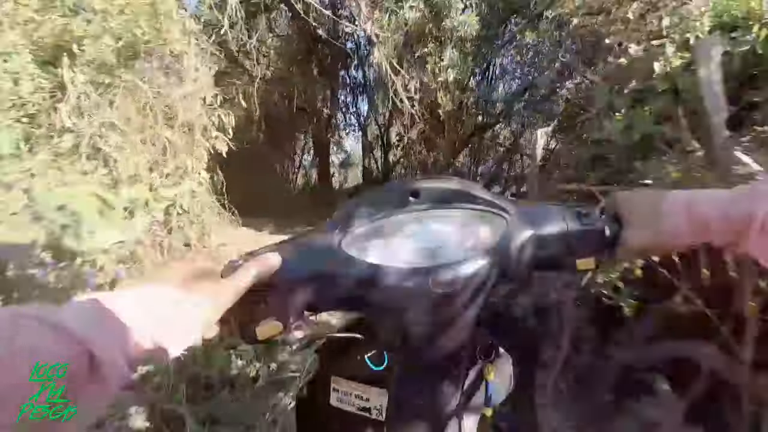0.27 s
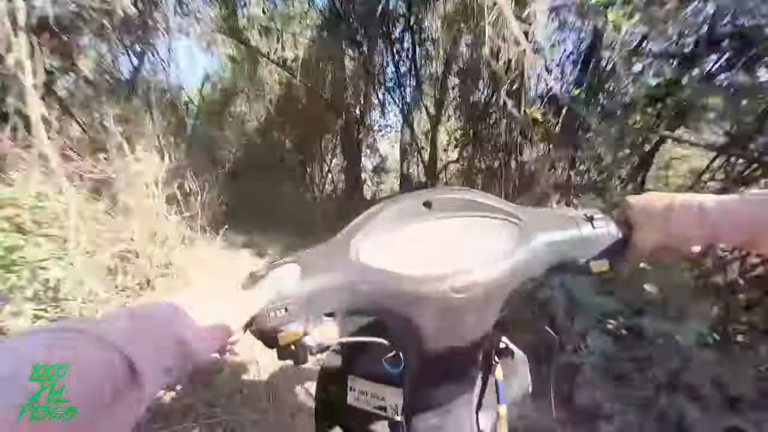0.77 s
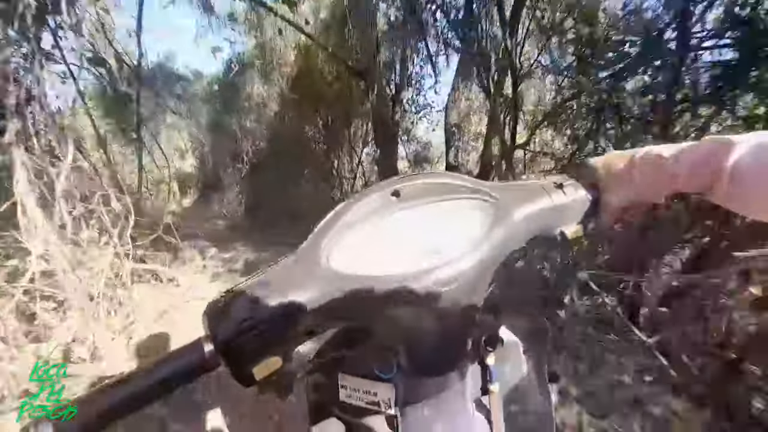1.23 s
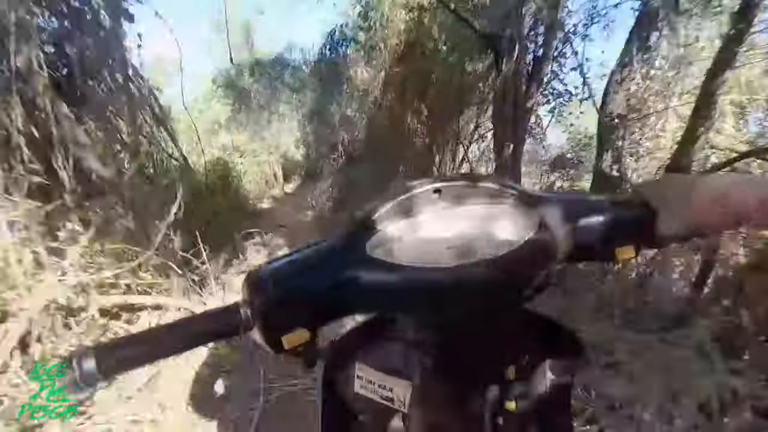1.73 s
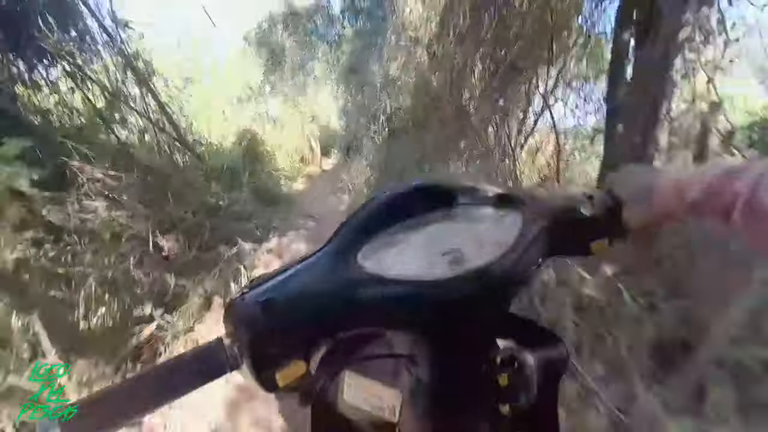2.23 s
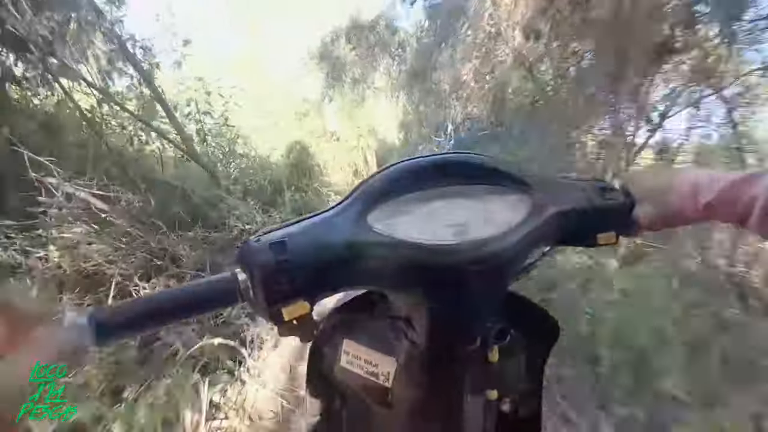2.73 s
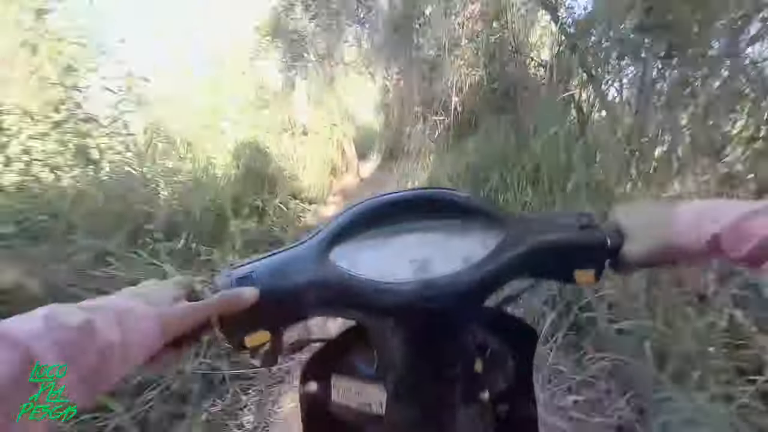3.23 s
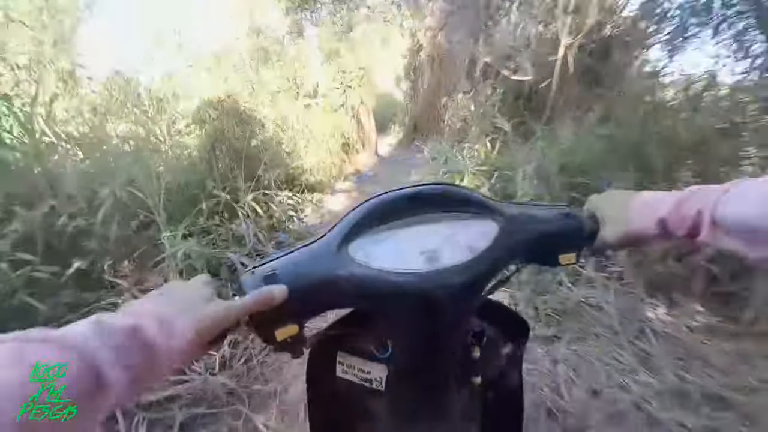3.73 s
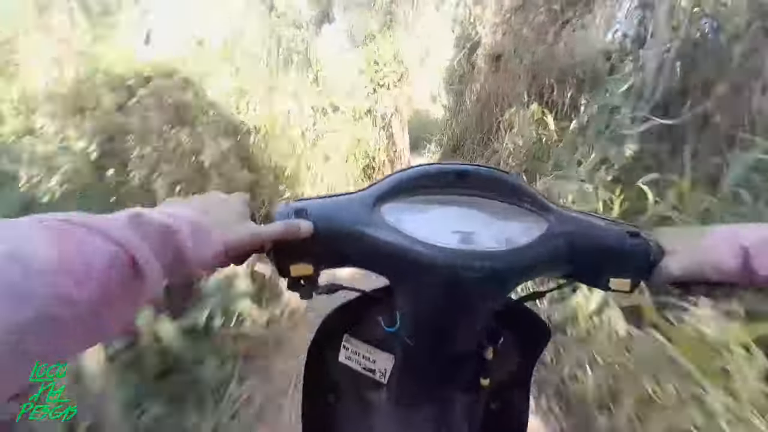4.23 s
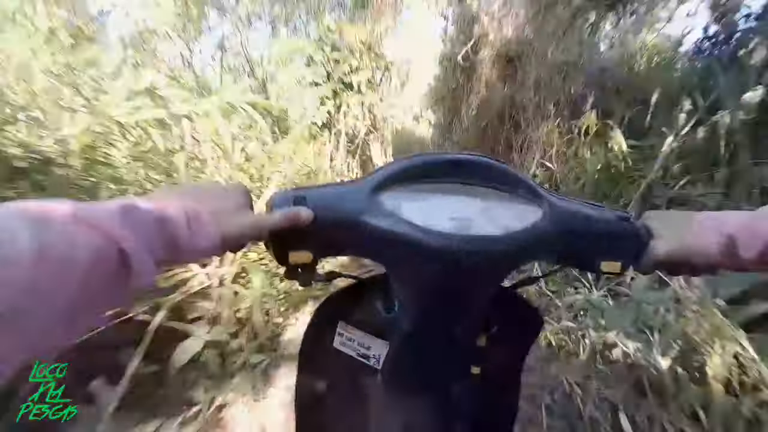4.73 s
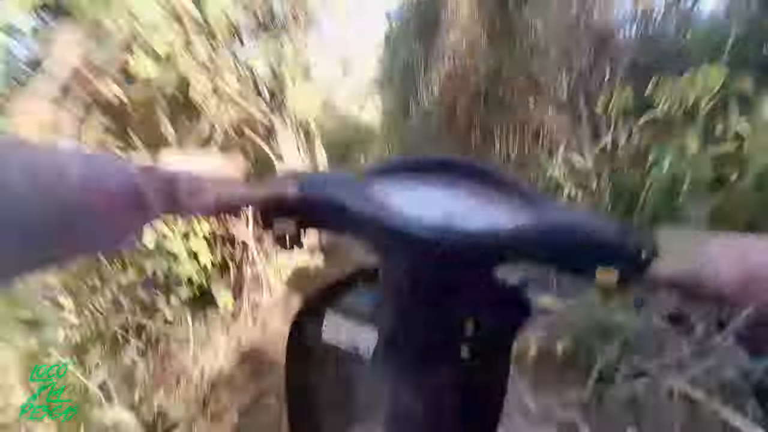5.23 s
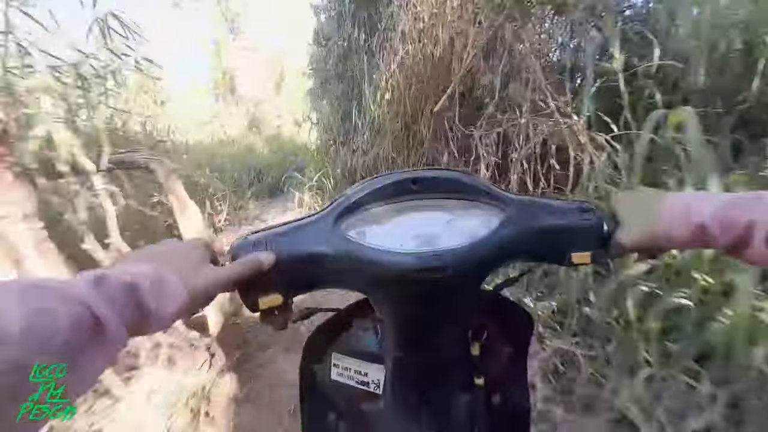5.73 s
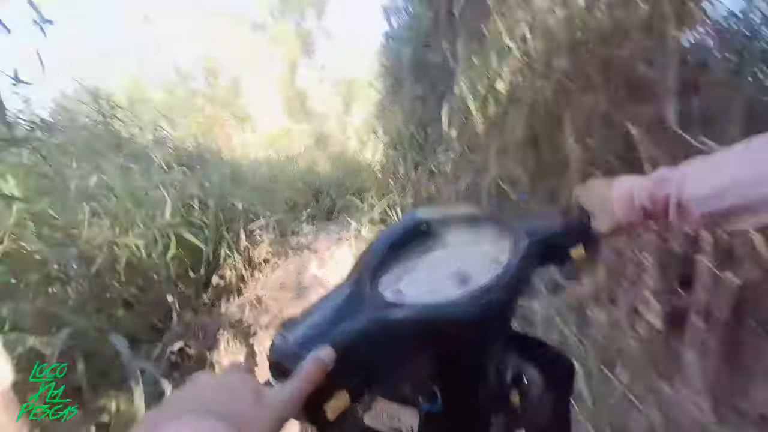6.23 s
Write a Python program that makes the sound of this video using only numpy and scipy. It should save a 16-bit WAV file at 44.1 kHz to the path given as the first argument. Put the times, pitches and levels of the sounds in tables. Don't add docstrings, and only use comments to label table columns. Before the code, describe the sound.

A low, soft putt-putt from a little scooter engine runs throughout, stumbling early, revving up before three seconds, sagging around five and rising again. Over it come a rumbling dirt surface, swishing dry undergrowth, hollow bodywork knocks, cracking twigs, ticking grit and slight key jingles. Outdoors, very close microphones on the rider or vehicle; the left channel is crisp with chopped engine thumps, the right muffled and bassy.

```python
import sys
import numpy as np
from scipy import signal
from scipy.io import wavfile

SR = 44100
rng = np.random.default_rng(int(sys.argv[2]) if len(sys.argv) > 2 else 0)


def inscribe(sig):
    pcm = np.round(np.clip(np.atleast_2d(sig).T, -1, 1) * 32767)
    wavfile.write(sys.argv[1], SR, pcm.astype(np.int16))


def gain_from_db(level_db):
    decades = np.asarray(level_db, float) / 20
    return 10 ** decades


N = 286209


def rms_one(x):
    return x / np.sqrt(np.mean(x ** 2) + 1e-20)


def at_hz(points, hz):
    point_hz, value = np.array(points).T[:2]
    return np.interp(np.log(hz), np.log(point_hz), value)


def in_time(rows):
    return np.interp(np.arange(N) / SR, *np.transpose(rows))


def drift(rate):
    r = np.exp(-80 * np.pi * rate / SR)
    noise = rng.standard_normal(N // 40 + 2002)
    slow = signal.lfilter([1], [1, -2 * r, r * r], noise)[2000:]
    return np.interp(np.arange(N) / 40, np.arange(len(slow)), rms_one(slow))


def passed(x, order, hz, kind):
    return signal.sosfilt(signal.butter(order, hz, kind, fs=SR, output="sos"), x)


def ring(clicks, hz, t60):
    r = gain_from_db(-60 / (t60 * SR))
    w = 2 * np.pi * hz / SR
    return signal.lfilter([0, np.sin(w)], [1, -2 * r * np.cos(w), r * r], clicks + 1e-18)


def resonate(x, hz, width_hz):
    r = np.exp(-np.pi * width_hz / SR)
    w = 2 * np.pi * hz / SR
    return signal.lfilter([(1 - r * r) / 2, 0, (r * r - 1) / 2], [1, -2 * r * np.cos(w), r * r], x)


def clicks_at(seconds, sizes):
    train = np.zeros(N)
    train[np.clip(np.round(seconds * SR).astype(int), 0, N - 1)] = sizes
    return train


def two_ports(source, open_port, covered_port, low_hz, top_hz, patchy_db):
    # pitch in Hz, likeness from 0 to 1.
    likeness = [(60, .7), (160, .75), (300, .7), (500, .55), (800, .35), (1400, .15), (15000, .05)]
    edges = low_hz * 2 ** np.arange(0, np.log2(top_hz / low_hz), 1 / 3)
    out = 0
    for k, (low, high) in enumerate(zip(edges, edges[1:])):
        a, b = passed(source[k % 2], 2, [low, high], "band")
        hz = np.sqrt(low * high)
        alike = np.clip(at_hz(likeness, hz), 0, 1)
        port_db = np.array([[at_hz(open_port, hz)], [at_hz(covered_port, hz)]])
        gains = gain_from_db(port_db + patchy_db * drift(23))
        out = out + gains * np.array([a, alike * a + np.sqrt(1 - alike ** 2) * b])
    return out / np.std(out[0])


def firings():
    # time in seconds, firings per second.
    speed = [(0.15, 19.065), (0.42, 15.917), (1.48, 16.018), (1.67, 14.188), (2.08, 14.169), (2.36, 18.806),
             (2.7, 20.536), (2.86, 20.932), (3.27, 19.705), (3.41, 17.228), (3.72, 18.3), (4.17, 18.355),
             (4.5, 16.405), (5.23, 14.38), (5.89, 15.741), (5.95, 16.96), (6.22, 17.998), (6.49, 21.663)]
    # time in seconds, firing strength in dB.
    throttle = [(.16, -2.5), (.5, -7.5), (.8, -5), (1.1, -5.5), (1.35, -2.5), (1.9, -1.5), (2.0, 3),
                (2.4, 1.5), (2.95, 1.5), (3.25, -3), (3.9, -1), (4.25, -3.5), (4.45, -2), (4.8, -2.5),
                (5.0, -1.5), (5.75, -.5), (5.9, 1.5), (6.45, 2)]
    # time in seconds, strength in dB, depth in dB, bark in dB.
    odd_firings = [(.0066, -2, -19, -32), (0.037, -4, -9, -5), (0.0707, -0.5, 7, -4),
                   (0.131, -10, -15, -10), (0.269, -4, 7, -5), (0.3316, -5, 2, 2.5), (0.3906, -15, -1, 6.5),
                   (0.5116, -6.5, 1, 2), (0.5764, -13.5, -4, 2), (0.6539, -16, -11, -15), (0.7, -13, 7, 2),
                   (.7690, -9, 7, 5.5), (0.895, -8, -5, 4.5), (0.953, -2, 5, -12), (1.3281, -4, 6, 4.5),
                   (1.455, -2.5, 3, 1.5), (1.5139, -2, 3, 2.5), (1.586, -14.5, -3, 0),
                   (1.721, -16.5, -6, 9), (1.8647, 0, -7, -0.5), (1.93, -1.5, 1, -3), (3.2661, -3, 1, -9),
                   (3.316, -13.5, -4, 6), (3.373, -6.5, 4, 4.5), (5.2042, -11, -4, 1.5),
                   (5.345, 0.5, -12, -8), (5.67, 0, 2.5, 1), (5.9903, 2.5, -2, 1), (6.0406, 1.5, -1, 0.5),
                   (6.327, 3, -7, 1.5)]
    first_turn = .098
    takes_place_s = .025
    turns = np.cumsum(in_time(speed)) / SR - first_turn
    seconds = np.interp(np.arange(int(turns[-1]) + 1), turns, np.arange(N) / SR)
    chance = rng.standard_normal((3, len(seconds)))
    strength_db = np.interp(seconds, *np.transpose(throttle)) + .5 * chance[0]
    above_idle = np.interp(seconds, *np.transpose(speed)) - 15.4
    depth_db = 2.5 - 1.47 * above_idle + .7 * chance[1]
    bark_db = 1 - .2 * strength_db + .5 * chance[2]
    odd = np.transpose(odd_firings)
    regular = np.abs(seconds[:, None] - odd[0]).min(axis=1) > takes_place_s
    even = np.array([seconds, strength_db, depth_db, bark_db])
    return np.hstack([even[:, regular], odd])


def exhaust(fired):
    # pitch in Hz, ring time t60 in seconds,
    # right level in dB, left level in dB, sign, part (0 body, 1 depth, 2 bark).
    silencer = [
        (121.8, .122, -.8, -13, -1, 0),
        (238, .18, -10.5, -14, -1, 2),
        (215, .045, 1.5, -6.5, 1, 2),
        (85.5, .1, -11.8, -25, 1, 1),
    ]
    seconds, strength_db, depth_db, bark_db = fired
    misfire_db, afterburn_db, afterburn_s = -10, 9, .07
    puff = signal.windows.hann(round(.006 * SR))
    puff /= puff.sum()
    scatter_db = .7 * rng.standard_normal((len(seconds), len(silencer), 2))
    parts_db = [0 * depth_db, np.clip(depth_db, -15, 7), bark_db]
    gas = gain_from_db(-63 + 2.5 * drift(6)) * rng.standard_normal(N)
    unburnt = clicks_at(seconds - afterburn_s / 4, strength_db < misfire_db)
    swell = signal.fftconvolve(unburnt, signal.windows.hann(round(afterburn_s * SR)))[:N]
    gas = gas * gain_from_db(afterburn_db * swell)
    out = np.zeros((2, N))
    for k, (hz, t60, right_db, left_db, sign, part) in enumerate(silencer):
        for side, level_db in enumerate((left_db, right_db)):
            blow_db = strength_db + parts_db[round(part)] + scatter_db[:, k, side]
            blows = clicks_at(seconds - .0089, gain_from_db(blow_db)) + gas
            out[side] += sign * gain_from_db(level_db) * ring(np.convolve(blows, puff)[:N], hz, t60)
    return out


def open_port_duck(fired):
    # from seconds, to seconds, share from 0 to 1.
    spared = [(0, .2, .7), (.2, .25, .3), (.25, .47, .55), (.75, .8, .35), (.8, 1.17, 1),
              (1.3, 1.35, .4), (1.49, 1.54, .4), (1.62, 1.68, .85), (1.76, 1.82, .6), (1.9, 1.96, .55),
              (1.97, 2.34, 1), (2.45, 2.5, .3), (2.5, 2.6, .8), (2.89, 2.94, .55), (2.99, 3.04, .5),
              (3.09, 3.14, .55), (3.14, 3.29, .9), (3.52, 3.57, .5), (3.63, 3.68, .45),
              (3.79, 3.84, .45), (3.96, 4.06, .65), (4.29, 4.34, .4), (4.4, 4.45, .4), (4.46, 4.51, .7),
              (4.52, 4.7, 1), (4.84, 4.89, .5), (4.97, 5.02, .5), (5.25, 5.36, .8), (5.52, 5.57, .4),
              (5.58, 5.63, .85), (5.84, 5.89, .45), (5.9, 5.95, .75), (6.25, 6.3, .4), (6.3, 6.35, .6),
              (6.4, 6.45, .4)]
    # seconds from the firing, share of the cut.
    duck_shape = [(-.011, 0), (-.006, .75), (-.003, 1), (.002, .95), (.006, .5), (.009, .3), (.013, 0)]
    seconds = fired[0]
    opened = sum(share * ((seconds >= a) & (seconds < b)) for a, b, share in spared)
    lead_s, tail_s = duck_shape[0][0], duck_shape[-1][0]
    duck = np.interp(np.arange(lead_s, tail_s, 1 / SR), *np.transpose(duck_shape))
    shut = signal.fftconvolve(clicks_at(seconds + lead_s, 1 - opened), duck)[:N]
    return 1 - .9 * np.clip(shut, 0, 1)


def engine_cycle(fired, lead_s, length_s):
    seconds, strength_db = fired[:2]
    bump = signal.windows.hann(round(length_s * SR))
    return np.convolve(clicks_at(seconds - lead_s, gain_from_db(.5 * strength_db)), bump)[:N]


def track():
    # time in seconds, brush level in dB.
    undergrowth = [(0, -53), (.6, -54.5), (1.1, -57.5), (1.6, -54), (2.1, -52.5), (2.75, -54.5),
                   (3.4, -50.5), (3.85, -53), (4.4, -51), (5.0, -51), (5.6, -52), (6.1, -54), (6.49, -51)]
    # peak in seconds, length in seconds,
    # brush rise in dB, rumble rise in dB.
    passes = [(.01, 0.071, 6.5, 0.5), (0.106, 0.26, 0.5, 6), (0.274, 0.11, 7.5, 6.5),
              (0.335, 0.17, -2, 4.5), (0.511, 0.068, 8, 2), (0.629, 0.095, 2.5, 4), (0.882, 0.17, 2.5, 3),
              (1.154, 0.062, 1.5, 3), (2.752, 0.09, 1, -1), (1.608, 0.092, 6.5, 7.5),
              (1.807, .14, 8.5, 2.5), (1.94, 0.18, 4, 2.5), (2.098, 0.12, -1, 3.5), (2.248, 0.16, 4, 2.5),
              (2.405, 0.067, 8.5, 3), (2.563, 0.15, 5, 2.5), (2.98, 0.17, 4.5, 8.5), (3.071, 0.075, 6, 7),
              (3.228, 0.13, 3.5, 5.5), (3.555, 0.16, -0.5, 1.5), (3.932, 0.087, 4.5, 1),
              (4.203, 0.39, 2, 4.5), (4.348, 0.08, 5, 1), (4.469, 0.078, 4, 1), (4.576, 0.1, 3.5, 0.5),
              (4.834, 0.052, 3.5, 2.5), (5.258, 0.14, 8, 4.5), (5.385, 0.14, 8, 3), (5.651, 0.03, 5.5, -3),
              (5.825, 0.17, 3, 3)]
    t = np.arange(0, N / SR + .002, .002)
    near_db = np.interp(t, *np.transpose(undergrowth))
    s, length_s, brush_db, rumble_db = np.transpose(passes)
    swells = np.cos(np.pi * np.clip((t - s[:, None]) / length_s[:, None], -.5, .5))
    ground_db = -42 + .21 * (near_db - near_db.mean()) + rumble_db @ swells
    leaves_db = near_db + brush_db @ swells
    return in_time(np.transpose([t, leaves_db])), in_time(np.transpose([t, ground_db]))


def rumble(fired, level_db):
    # pitch in Hz, level in dB per Hz.
    rumble_open = [(30, -10), (70, -14), (130, 0.5), (180, -8), (260, -0.5), (350, -0.5), (600, -4.5),
                   (900, -15), (1500, -26.5), (3000, -30)]
    rumble_covered = [(30, -1), (70, 7.5), (130, 8.5), (260, -1), (350, -6.5), (600, -7.5), (900, -46),
                      (1500, -37.5), (3000, -72)]
    source = rng.standard_normal((2, 2, N))
    noise = two_ports(source, rumble_open, rumble_covered, 28.1, 3200, patchy_db=1.37)
    noise += gain_from_db(-7.5) * resonate(noise, hz=352, width_hz=50)
    shake_db = 3.0 * engine_cycle(fired, .006, .024)
    return noise * gain_from_db(level_db + 3.6 + shake_db + .5 * drift(4))


def brush(level_db, bright_db):
    # pitch in Hz, level in dB per Hz.
    brush_open = [(600, -15.5), (1000, 1.5), (1400, 4), (1800, -2.5), (3000, 1), (3900, -3), (5600, -4),
                  (7200, -13.5), (8700, -20), (11000, -12.5), (13500, -10), (15800, -6.5)]
    brush_covered = [(600, -10), (1000, -1.5), (1800, -23), (2300, -61.5), (3000, -19.5), (3900, -21),
                     (5300, -55), (7200, -59.5), (11000, -41), (15800, -33)]
    port_hz, port_width_hz, port_db = 4600, 750, -28
    sizes = gain_from_db(1.5 * np.minimum(rng.exponential(1, (2, 2, N)), 6))
    sizes = sizes * (rng.random((2, 2, N)) < 3000 / SR)
    grains = rng.standard_normal((2, 2, N)) * (1 + 2.0 * sizes)
    leaves = two_ports(grains, brush_open, brush_covered, 603, 19000, patchy_db=2.5)
    cavity = resonate(resonate(grains[1, 1], port_hz, port_width_hz), port_hz, port_width_hz)
    leaves[1] += gain_from_db(port_db + 20.0) * cavity
    top = passed(leaves, 4, 7500, "high")
    leaves = leaves + top * (gain_from_db(bright_db - np.mean(bright_db)) - 1)
    pressed = np.clip((level_db - np.median(level_db) - 2) / 8, 0, 1)
    leaves = leaves + 1.5 * pressed * resonate(leaves, hz=5300, width_hz=1400)
    return leaves * gain_from_db(level_db + 5.0 + 1.0 * drift(25) + .8 * drift(70))


def clatter(fired, level_db):
    # pitch in Hz, level in dB, ring time t60 in seconds.
    casing = [(1510, -48.5, 0.03), (2217, -42, 0.014), (2405, -44, 0.016), (4754, -41.5, 0.0084),
              (5270, -41.5, 0.0052), (6320, -39, 0.0051), (12300, -50.5, 0.0061)]
    seconds = fired[0]
    chance = rng.standard_normal((len(seconds), len(casing), 2))
    follow = gain_from_db(.5 * (level_db - np.mean(level_db)))
    out = np.zeros(N)
    for k, (hz, db, t60) in enumerate(casing):
        tick_db = (-2.0 if hz > 4000 else -9.0) + 3.0 * chance[:, k, 1]
        shut = clicks_at(seconds + .012 + .0015 * chance[:, k, 0], gain_from_db(tick_db))
        valve = shut + .76 * np.roll(shut, round(.002 * SR))
        busy = rng.random(N) < 300 * gain_from_db(6.0 * drift(6)) / SR
        hit_db = -16.5 + 4.4 * np.minimum(rng.exponential(1, N), 4)
        loose = busy * gain_from_db(hit_db) * rng.choice([-1, 1], N)
        whir = gain_from_db(-37 + 5.0 * drift(7)) * rng.standard_normal(N)
        out += gain_from_db(db) * ring(valve + (loose + whir) * follow, hz, t60)
    return out * gain_from_db([[0], [-30]])


def swishes():
    # peak in seconds, length in seconds, 2-7 kHz level in dB, top level in dB.
    whips = [(0.016, 0.045, -62, -51.5), (0.135, .04, -48, -54.5), (0.255, 0.043, -53, -65.5),
             (0.28, 0.023, -56, -56), (0.344, .03, -51, -61.5), (1.431, 0.044, -54, -59),
             (1.791, 0.026, -49, -58), (1.831, 0.055, -45, -50), (2.332, 0.012, -43, -54),
             (2.406, 0.041, -43, -53.5), (2.572, 0.078, -52, -61), (2.94, 0.029, -45, -59),
             (2.998, 0.031, -54, -57), (3.057, 0.039, -58, -56), (3.228, 0.04, -58, -69.5),
             (3.874, 0.035, -67, -59.5), (4.858, 0.037, -52, -59), (5.257, 0.051, -45.5, -47.5),
             (5.36, 0.042, -54.5, -58), (5.719, .025, -53, -56.5), (5.825, 0.018, -48, -47),
             (6.427, 0.041, -61, -64)]
    t = np.arange(N) / SR
    pops = gain_from_db(3.9 * np.minimum(rng.exponential(1, N), 5)) * (rng.random(N) < 1500 / SR)
    crackle = rng.standard_normal((2, N)) * (1 + 1.5 * pops)
    middle = passed(crackle[0], 3, [1700, 6900], "band")
    top = resonate(passed(crackle[1], 3, 9800, "high"), hz=11800, width_hz=3300)
    gains = np.zeros((2, N))
    for s, length_s, middle_db, top_db in whips:
        near = slice(max(round((s - length_s) * SR), 0), round((s + length_s) * SR))
        swell = np.cos(np.pi * np.clip((t[near] - s) / length_s, -.5, .5))
        gains[:, near] += gain_from_db([[middle_db], [top_db]]) * np.sqrt(np.clip(swell, 0, 1))
    return (gains[0] * rms_one(middle) + gains[1] * rms_one(top)) * gain_from_db([[0], [-17]])


def knocks():
    # start in seconds, peak in dB, pitch in Hz.
    bumps = [(0.07, -27, 494), (0.117, -19, 487), (0.2735, -28, 894), (0.281, -18, 630),
             (0.312, -26.5, 506), (0.353, -22.5, 520), (0.519, -26, 550), (1.125, -25, 543),
             (1.603, -32, 418), (1.719, -26, 490), (1.969, -24, 515), (2.05, -26, 474), (2.733, -35, 600),
             (2.94, -20, 482), (2.981, -15, 492.5), (3.063, -18, 446), (3.178, -23, 594), (3.605, -25, 479),
             (4.474, -39, 440), (5.29, -42, 473), (5.373, -42, 500), (6.003, -26, 485)]
    t = np.arange(round(.08 * SR)) / SR
    burst = passed(rng.standard_normal((len(bumps), len(t))), 2, [400, 2200], "band")
    out = np.zeros(N)
    for (s, db, hz), noise in zip(bumps, burst):
        tones = np.sin(2 * np.pi * hz * t) + .5 * np.sin(2 * np.pi * 1.7 * hz * t)
        fade = gain_from_db(db - 11.0 - 60 * t / .14) * (1 - np.exp(-t / .0031))
        i = round(s * SR)
        out[i:i + len(t)] += fade * (1.4 * tones + 1.47 * noise)
    return np.array([out, gain_from_db(-5) * passed(out, 2, 800, "low")])


def keys():
    # start in seconds, peak in dB.
    jingles = [(0.1181, -44), (0.5194, -42.5), (0.56, -50), (1.59, -47), (3.0495, -43), (3.8616, -43),
               (3.919, -49), (4.0994, -53), (4.1596, -49), (4.7294, -45), (5.821, -46)]
    # pitch in Hz, level in dB, ring time t60 in seconds.
    steel = [(12060, 2, .06), (12300, 10, 0.052), (12550, 3, .04), (14700, 6, .06)]
    seconds, peak_db = np.transpose(jingles)
    lags = rng.uniform(0, .02, (len(seconds), 3)) * [0, 1, 2]
    touches = sum(clicks_at(seconds + lag, gain_from_db(peak_db - 16.0)) for lag in lags.T)
    tones = sum(gain_from_db(db) * ring(touches, hz, t60) for hz, db, t60 in steel)
    return tones * gain_from_db([[0], [-26]])


def snaps():
    # start in seconds, peak in dB, pitch in Hz.
    twigs = [(0.119, -36, 1770), (0.246, -29, 1930), (0.272, -23.5, 1970), (0.497, -41, 3080),
             (1.1543, -35, 2310), (1.599, -37, 1500), (2.3306, -50, 1510), (2.391, -27, 2420),
             (2.489, -41, 1650), (2.568, -28.5, 2210), (2.9287, -36, 2660), (2.9724, -28.5, 2450),
             (2.992, -31, 2370), (3.291, -29.5, 1520), (3.398, -37, 4800), (3.4416, -37, 2220),
             (3.5573, -36, 2260), (4.0494, -37, 1500), (4.3211, -36, 1540), (4.3954, -34, 2540),
             (4.449, -48, 1480), (4.5467, -37, 1980), (4.61, -30.5, 2510), (4.651, -30.5, 2300),
             (5.249, -23.5, 2300), (5.3316, -28, 4600), (5.369, -30, 2180), (5.4914, -37, 4750),
             (5.821, -39, 2340), (5.9268, -36, 4720)]
    seconds, peak_db, _ = np.transpose(twigs)
    crack = passed(clicks_at(seconds, gain_from_db(peak_db - 4.0)), 2, 1500, "high")
    t = np.arange(round(.02 * SR)) / SR
    for s, db, hz in twigs:
        i = round(s * SR)
        crack[i:i + len(t)] += gain_from_db(db - 60 * t / .013) * np.sin(2 * np.pi * hz * t)
    return crack * gain_from_db([[0], [-30]])


def faint_snaps():
    # start in seconds, peak in dB, pitch in Hz.
    small_twigs = [(0.3418, -39.5, 6350), (0.5846, -38, 4660), (0.7806, -46, 4440), (0.843, -45, 4900),
                   (0.9686, -44, 5030), (1.0318, -51, 3550), (1.0522, -40.5, 4700), (1.1543, -43, 4620),
                   (1.215, -40, 6700), (1.581, -37, 4680), (1.6018, -37, 5660), (1.6637, -37.5, 5150),
                   (2.3296, -45, 3670), (2.391, -34, 3500), (2.392, -32.5, 4390), (2.4877, -32.5, 5490),
                   (2.786, -45, 5040), (2.929, -33, 4400), (2.9871, -36.5, 4640), (3.0739, -37, 4720),
                   (3.1867, -39.5, 4980), (3.3944, -37, 4780), (3.5557, -47, 4650), (3.721, -41, 5830),
                   (3.8344, -47, 4690), (4.0502, -41, 4690), (4.1599, -36, 6260), (4.3237, -36.5, 4710),
                   (4.3959, -35, 4500), (4.4358, -40, 4580), (4.4532, -35.5, 4900), (4.5057, -35.5, 6440),
                   (4.5461, -36, 4700), (5.014, -50, 4220), (5.3328, -35, 4510), (5.3667, -28, 5310),
                   (5.4121, -36, 5300), (5.4914, -38, 4740), (5.5583, -43, 4930), (5.624, -34, 4600),
                   (5.8212, -47, 4800), (5.9259, -35.5, 4640), (5.945, -35, 4850), (6.416, -40.5, 4870),
                   (6.4326, -36, 5080)]
    t = np.arange(round(.015 * SR)) / SR
    overtone = gain_from_db(-13.5) * np.sin(2 * np.pi * 11900 * t)
    out = np.zeros(N)
    for s, db, hz in small_twigs:
        i = round(s * SR)
        out[i:i + len(t)] += gain_from_db(db + 2.5 - 60 * t / .011) * (np.sin(2 * np.pi * hz * t) + overtone)
    return out * gain_from_db([[0], [-20]])


def scene():
    fired = firings()
    ducking = open_port_duck(fired)
    brush_db, rumble_db = track()
    boom = exhaust(fired) * [ducking, np.ones(N)]
    bright_db = 1.3 * drift(11) - .2 * brush_db
    treble = brush(brush_db, bright_db) + clatter(fired, brush_db)
    treble *= ducking ** .22 * gain_from_db(-1.2 * engine_cycle(fired, .013, .024))
    return boom + rumble(fired, rumble_db) + treble + swishes() + knocks() + keys() + snaps() + faint_snaps()


def roll_off(x):
    return signal.sosfilt(signal.butter(12, 15720, fs=SR, output="sos"), x)


def record(dry):
    lag = 11
    late = np.concatenate([np.zeros(lag), dry[1, :-lag]])
    hiss = gain_from_db(-88.5) * rng.standard_normal(N)
    open_port = passed(dry[0], 2, 36, "high")
    covered_port = passed(late + hiss, 2, 52, "high")
    return roll_off(np.array([open_port, covered_port]))


dry = scene()
out = record(dry)
inscribe(out)
```